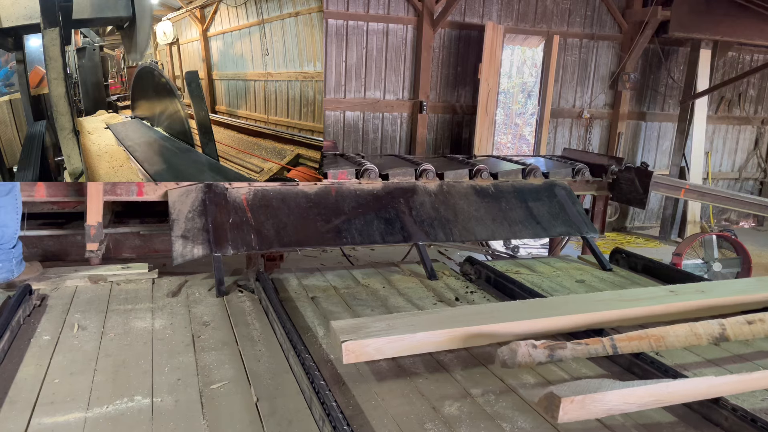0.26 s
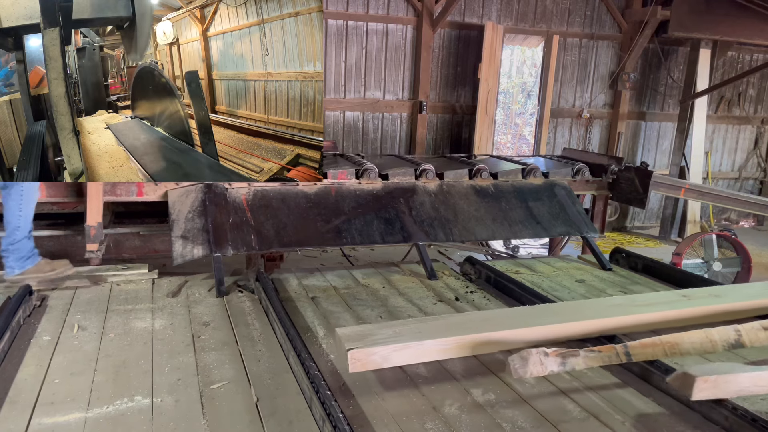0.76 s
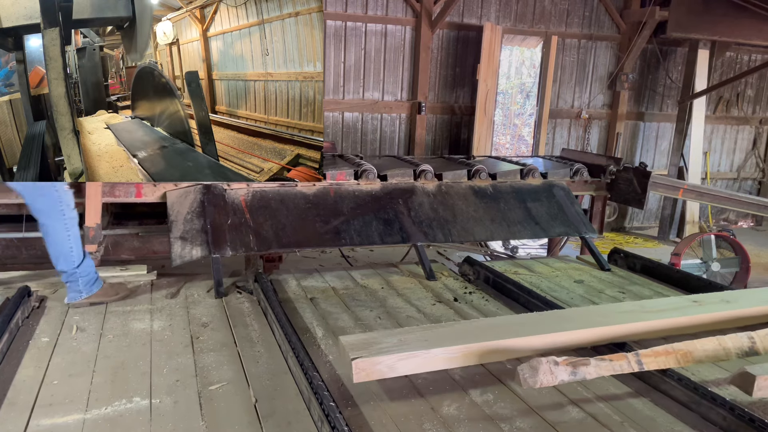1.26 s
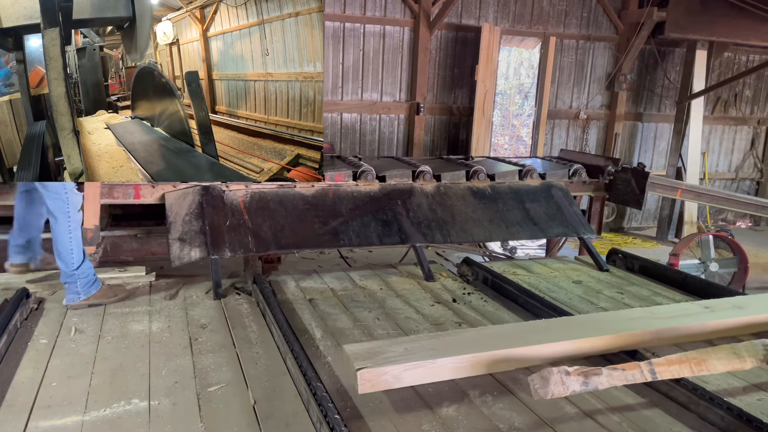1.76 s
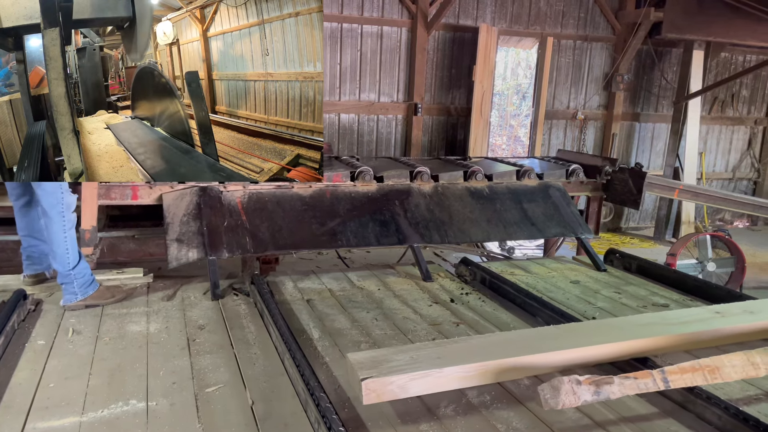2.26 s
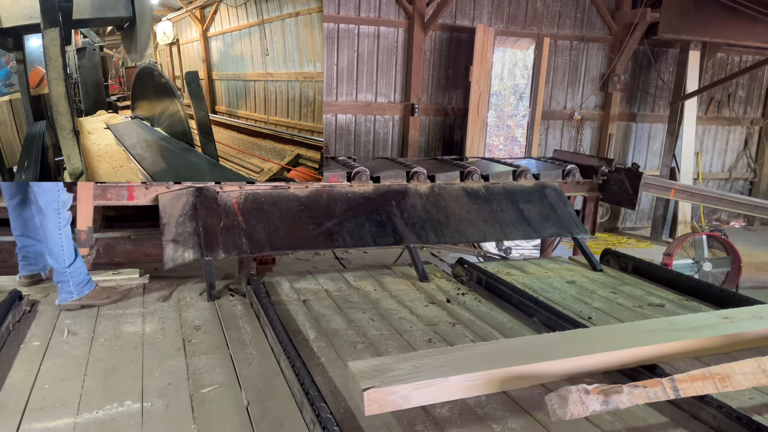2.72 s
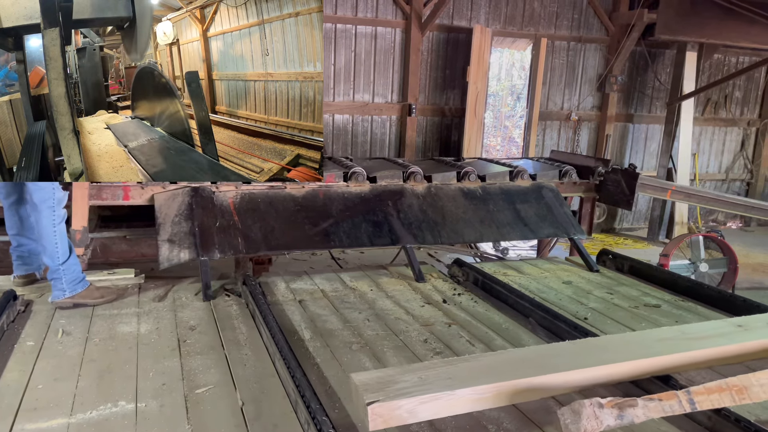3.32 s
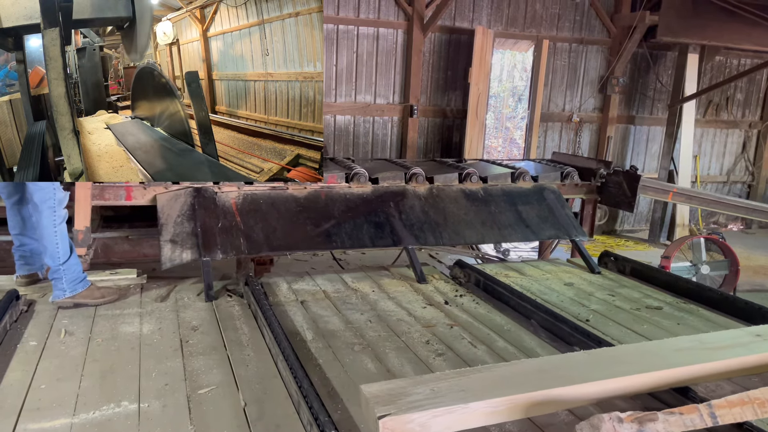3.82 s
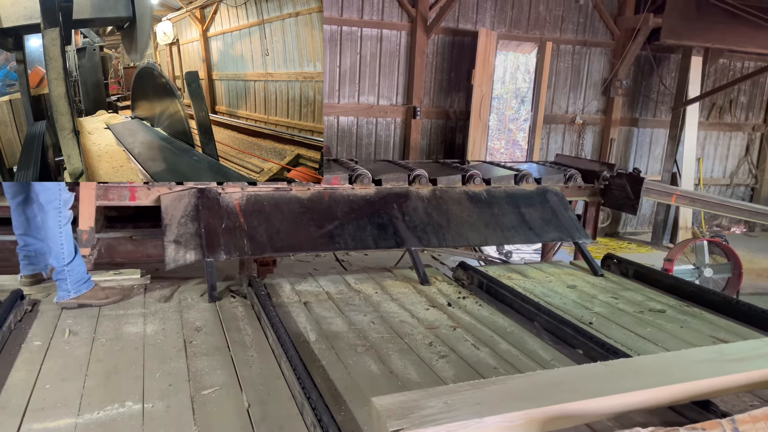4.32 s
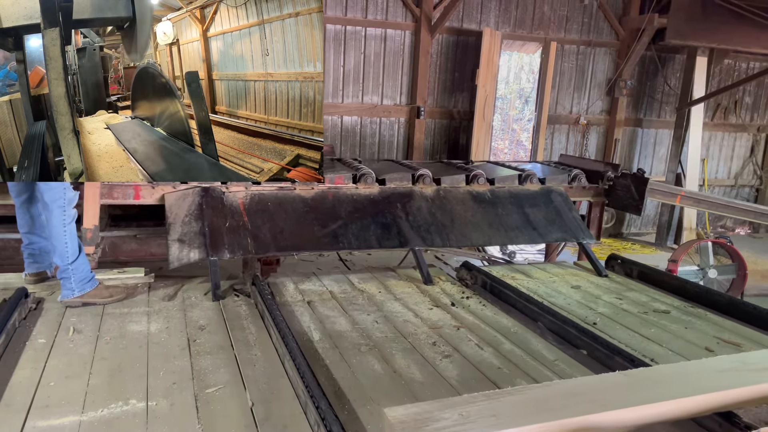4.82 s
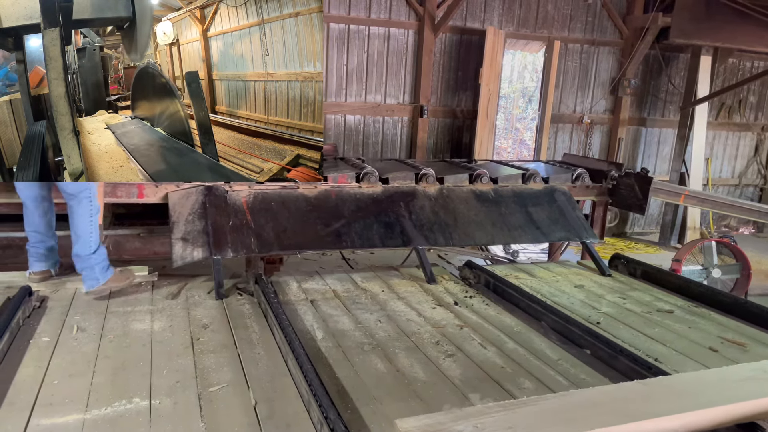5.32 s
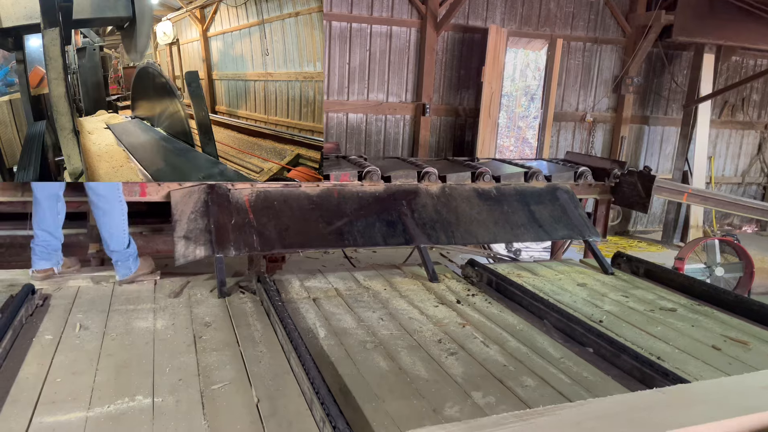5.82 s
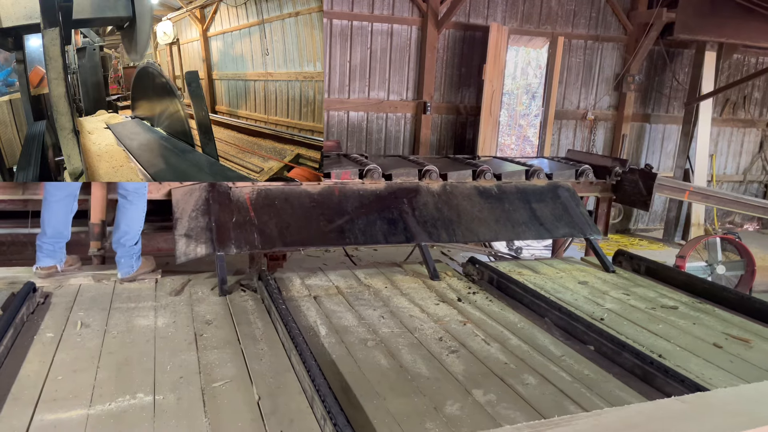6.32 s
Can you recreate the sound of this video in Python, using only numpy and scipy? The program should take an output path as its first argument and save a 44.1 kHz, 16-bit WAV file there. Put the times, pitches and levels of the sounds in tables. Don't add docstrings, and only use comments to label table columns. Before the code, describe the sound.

From 0 s a sawmill shed is already at full work: heavy motor and belt rumble, shaking steel frames, a broad airy roar and a dense, random rattle of chain links over sprockets and rails. Sharp metallic knocks, short and mid-high, strike irregularly throughout, with two at once near 0.1 s and clusters around 0.8 to 1.3, 3.0 to 3.6 and 5.4 to 6.0. A low drive hum swells unevenly, strongest near 1.3 s. Around 2.55 s timber scrapes and gives a low squeak; higher squeaks follow at 2.9 and 3.1, then a hard woody crack at 3.6. Crisp ticks gather near 5.75 to 6.0 s. From about 6.2 s a saw's steady buzzing, singing tone emerges over its faint whine, growing fast until the cut-off at roughly 6.6 s. Floor-level stereo microphones, loud and close, leaning left, diffuse shed around.

```python
import sys
import numpy as np
from scipy import signal
from scipy.fft import rfft, irfft
from scipy.io import wavfile
from scipy.ndimage import uniform_filter1d

SR = 44100
rng = np.random.default_rng(int(sys.argv[2]) if len(sys.argv) > 2 else 0)


def to_wav(s):
    ch = np.atleast_2d(s).T
    pcm = np.round(np.clip(ch, -1, 1) * 32767)
    wavfile.write(sys.argv[1], SR, pcm.astype(np.int16))


def how_loud(loudness_db):
    steps = np.asarray(loudness_db, float) / 20
    return 10 ** steps


N = 289888
T = np.arange(N) / SR
HZ = np.maximum(np.fft.rfftfreq(N, 1 / SR), 1.)
BURST = 16384


def on_hz(table):
    hz, value = np.transpose(table)
    return np.interp(np.log(HZ), np.log(hz), value)


def unit(x):
    return x / np.sqrt(np.mean(x ** 2))


def peak(hz, width_hz, bins=HZ):
    return 1 / np.sqrt(1 + ((bins ** 2 - hz ** 2) / (bins * width_hz)) ** 2)


def noise(gain):
    return irfft(rfft(rng.standard_normal(N)) * gain, N)


def walk(rate):
    hold = int(SR / rate)
    steps = np.repeat(rng.standard_normal(N // hold + 1), hold)
    return 1.92 * uniform_filter1d(uniform_filter1d(steps, hold), hold)[:N]


def ring(x, hz, t60):
    pole = np.exp(2j * np.pi * hz / SR - np.log(1000) / (t60 * SR))
    return signal.lfilter([1], [1, -pole], x).imag


def add(out, s, sound):
    i = int(s * SR) - BURST // 2
    a, b = max(i, 0), min(i + BURST, N)
    out[a:b] += sound[a - i:b - i]


def load():
    # time in seconds, motor effort in dB, drag on the chain in dB.
    plant = [(0, -1.3, -1), (.45, -1, -0.4), (.9, -.5, -1.1), (1.3, 0.1, 0), (2, 0.7, -1.5),
             (2.35, 0, -0.1), (2.8, 1, -0.6), (3.2, -0.5, 0.6), (3.6, -0.5, -0.5), (3.85, 0, -0.5),
             (4.2, 0.5, -1), (4.65, 0.3, -0.4), (5, 0, 0), (5.45, 0, -2), (5.85, 0.5, 0), (6.2, 1.5, 0),
             (6.57, -1.5, -0.5)]
    # dB per dB of effort, dB per dB of drag.
    follows = [
        (1.26, 0.01),
        (0.36, 0.054),
        (0.05, 0.94),
        (0.12, 0.83),
    ]
    s, effort, drag = np.transpose(plant)
    effort_db, drag_db = np.interp(T, s, effort), np.interp(T, s, drag)
    return [a * effort_db + b * drag_db for a, b in follows]


def frames():
    # frequency in Hz, width in Hz, level in dB.
    frame_modes = [(76.9, 6.2, -35), (111.7, 8.4, -32), (164.4, 5.7, -34), (171.4, 16, -31),
                   (246, 15, -34.5), (277.2, 4.8, -30), (323, 9.8, -39), (531.5, 23, -35.5),
                   (608, 24, -33.5), (678.6, 24, -33.5), (907, 34, -33.5), (980, 24, -58), (718, 14, -43),
                   (766.5, 13, -36), (838, 21, -40.5), (1035, 25, -35.5), (1064, 8.6, -45), (1195, 11, -38),
                   (1266, 20, -65), (1289, 19, -43)]
    modes = sum(how_loud(db) * unit(noise(peak(hz, width) ** 2)) for hz, width, db in frame_modes)
    return modes * how_loud(load()[0])


def jerks():
    # time at the crest in seconds, surge in dB, half length in seconds.
    pulls = [(0.352, 1, 0.037), (.76, 2.5, 0.037), (.95, -1.5, .05), (1.303, 0.5, 0.041),
             (1.536, 1.5, 0.063), (1.847, 1.5, 0.071), (2.05, 1.5, 0.027), (2.143, 1.5, 0.054),
             (2.25, 0, 0.033), (2.752, -2, 0.046), (2.876, 2, 0.035), (3.1, 1, 0.063), (3.35, 1, .04),
             (3.45, 0.5, .03), (3.58, 0.5, 0.03), (4.267, 2.5, 0.087), (4.653, -3, 0.042),
             (5.203, 1.5, 0.029), (5.33, 0, .04), (5.45, 1.5, .04), (5.535, 0.5, 0.023), (5.813, 2, 0.074),
             (5.97, 0, 0.034), (6.45, -1.5, 0.094)]
    return sum(db * np.exp(-.5 * ((T - s) / half) ** 2) for s, db, half in pulls)


def link_blows(surge):
    rate_per_s, spread_db = 800, 1.9
    chance = rng.random((2, N))
    strength_db = -spread_db * np.log(1 - chance[1]) + 1.8 * surge + .7 * walk(9)
    return (chance[0] < rate_per_s / SR) * how_loud(strength_db)


def chain(blows):
    # frequency in Hz, level in dB, 60 dB fall time in seconds.
    link_modes = [(1605, -0.5, 0.042), (1820, -24, 0.026), (2180, -33, 0.017), (2310, -6, 0.17),
                  (2520, -2, 0.07), (2780, -1, 0.049), (2913, -1.5, 0.033), (3120, -1, 0.027),
                  (3228, -3.5, 0.058), (3510, -6.5, 0.023), (3857, -7.5, 0.033), (4276, -10, 0.028),
                  (4780, -11.5, 0.02), (6370, -37, .03), (7400, -20, 0.034)]
    hit, out = np.flatnonzero(blows), 0
    for hz, db, t60 in link_modes:
        push = np.zeros(N)
        push[hit] = blows[hit] * rng.standard_normal(len(hit))
        out = out + how_loud(db) * unit(ring(push, hz, t60))
    return unit(out) * how_loud(load()[2] - 26.1)


def knocks():
    # start in seconds, peak level in dB, ring frequency in Hz.
    loud_knocks = [(0.058, -7, 2880), (0.0872, -12, 2520), (0.3311, -29, 2820), (0.3511, -15, 2510),
                   (0.4279, -19, 2450), (0.5038, -14, 3240), (0.7068, -17, 2870), (0.7677, -9, 3020),
                   (0.836, -34, 2310), (0.87, -8.5, 3030), (1.0026, -19, 2800), (1.062, -7.5, 2570),
                   (1.272, -13, 2670), (1.3249, -15, 2480), (1.9589, -9, 3070), (2.0951, -16, 2670),
                   (2.1665, -12, 2520), (2.3087, -15, 2800), (2.3286, -22, 1820), (2.4389, -18, 2780),
                   (2.6155, -21, 2830), (2.9692, -17, 2870), (3.0011, -11, 3200), (3.0674, -9, 2680),
                   (3.0964, -21, 2420), (3.1712, -12, 2070), (3.1946, -23, 2470), (3.2331, -10.5, 3150),
                   (3.4356, -19, 2620), (3.5269, -24, 3030), (3.5696, -10.5, 2830), (3.6316, -17, 3280),
                   (4.145, -19, 2670), (4.1715, -11, 2900), (4.2592, -15, 3320), (4.4273, -14, 2940),
                   (4.5501, -16, 2800), (4.9866, -17, 2910), (5.069, -10, 3140), (5.1696, -13, 3140),
                   (5.4226, -24, 2390), (5.469, -11, 2900), (5.499, -8.5, 2460), (5.7548, -11, 2340),
                   (5.8037, -10, 2230), (5.8341, -23, 3040), (5.9858, -10, 2050), (6.0477, -17, 2700),
                   (6.4358, -12, 2260), (6.538, -18.5, 1870)]
    level_db, attack_s, t60_s = -3.5, 0.00075, .05
    out = np.zeros(N)
    chance = rng.standard_normal((len(loud_knocks), 5, 2))
    for (s, db, hz), draw in zip(loud_knocks, chance):
        i = int(s * SR)
        t = T[:min(6000, N - i)]
        tone = sum(np.sin(2 * np.pi * hz * (1 + 0.11 * d) * t + p) for d, p in draw) / 2.5
        envelope = np.minimum(t / attack_s, 1) * how_loud(-60 * t / t60_s)
        out[i:i + len(t)] += how_loud(db + level_db) * tone * envelope
    return out


def timber():
    # crest in seconds, level in dB, centre in Hz, fall in seconds.
    scrapes = [(.27, -46, 7000, 0.07), (.72, -49, 7000, .05), (1.76, -42, 10000, .07),
               (2.515, -42, 9500, .025), (2.552, -29.5, 7000, 0.017), (2.56, -30, 4600, 0.023),
               (2.685, -37, 6000, .02), (2.9, -38, 5000, .022), (3.06, -35, 9500, 0.016),
               (3.097, -33, 6800, .015), (3.103, -31, 4400, 0.024), (3.068, -30, 5000, .01),
               (3.335, -38, 10500, 0.024), (4.2, -43, 7000, .06), (4.189, -43, 10500, 0.028),
               (4.86, -37, 4470, 0.029), (5.1, -39, 9000, .04), (5.79, -45, 11500, 0.036),
               (5.89, -44, 10500, .05)]
    # crest in seconds, level in dB, pitch in Hz, fall in seconds.
    squeaks = [(2.567, -24.5, 1180, .015), (2.6, -24.5, 1195, .011), (2.895, -30, 2490, .012),
               (3.1, -26.5, 2450, .01), (3.097, -28, 4130, .008), (3.12, -33, 5000, .02),
               (3.11, -32, 4550, .012), (3.13, -32, 4200, .01), (3.095, -33, 5200, .008),
               (4.19, -46, 11000, .02), (3.615, -24, 1950, 0.008), (5.905, -30, 1650, .03)]
    # start in seconds, peak level in dB, centre in Hz, fall in seconds.
    dry_ticks = [(.6604, -24, 5000, .006), (1.197, -24, 4500, .006), (1.749, -36, 9000, .02),
                 (2.548, -25, 5800, .01), (3.3348, -23, 5000, .006), (3.556, -29, 4900, .006),
                 (3.608, -13, 3180, 0.0086), (3.607, -21, 4800, 0.0035), (3.608, -14, 2100, .006),
                 (3.642, -27, 3200, .004), (3.6865, -23, 4800, .005), (4.024, -23, 4500, .006),
                 (4.5965, -33, 4600, .005), (4.9616, -29, 4700, .005), (5.5707, -27, 4900, .005),
                 (5.751, -20, 4700, .005), (5.766, -23, 6600, .008), (5.766, -28, 15200, .005),
                 (5.766, -25, 11000, .004), (5.776, -31, 12000, .005), (5.795, -17, 6000, 0.006),
                 (5.796, -24, 11300, .006), (5.814, -26, 10800, 0.0066), (5.816, -16.5, 6500, .008),
                 (5.991, -20, 4500, .005), (6.118, -28, 6000, .005), (6.142, -27, 5500, .005),
                 (6.142, -31, 10000, .004), (6.142, -35, 14500, .003), (6.118, -40, 13000, .004),
                 (6.239, -33, 10500, .005)]
    drags, ticks = np.zeros(N), np.zeros(N)
    t = (np.arange(BURST) - BURST // 2) / SR
    bins = np.maximum(np.fft.rfftfreq(BURST, 1 / SR), 1.)

    def hiss(hz, width_hz):
        return unit(irfft(rfft(rng.standard_normal(BURST)) * peak(hz, width_hz, bins) ** 2))

    def squeal(hz):
        tone = np.sin(2 * np.pi * (hz * t + rng.random()))
        return unit(tone + .35 * hiss(hz, .08 * hz))

    def swell(fall):
        return np.exp(-.5 * (t / np.where(t < 0, .6 * fall, fall)) ** 2)

    for s, db, hz, fall in scrapes:
        add(drags, s, how_loud(db) * swell(fall) * hiss(hz, .75 * hz))
    for s, db, hz, fall in squeaks:
        add(drags, s, how_loud(db) * swell(fall) * squeal(hz))
    for s, db, hz, fall in dry_ticks:
        age = np.maximum(t, 0)
        decay = (t >= 0) * (0.92 * np.exp(-age / 0.003) + 1.05 * np.exp(-age / fall))
        add(ticks, s, how_loud(db - 9.5) * decay * hiss(hz, 0.66 * hz))
    gritty = drags * how_loud(2.4 * walk(220))
    drag_top_hz, tick_top_hz = 11600, 13200
    dull = rfft(gritty) / (1 + (HZ / drag_top_hz) ** 8)
    crisp = rfft(ticks) / (1 + (HZ / tick_top_hz) ** 8)
    return irfft(dull + crisp, N)


def hum():
    # crest in seconds, level in dB, half length in seconds.
    belt_swells = [(.05, -22, .08), (.25, -30, .06), (.48, -18.5, .08), (.7, -28, .06), (.93, -21, .09),
                   (1.12, -27, .05), (1.3, -14, .09), (1.63, -19, .07), (1.82, -19, .06), (2.05, -22, .04),
                   (2.25, -25, .04), (2.62, -24, .1), (2.85, -24, .05), (3.04, -23, .05),
                   (3.48, -19.5, .07), (3.77, -18, .08), (4.05, -23, .04), (4.68, -20, .05),
                   (5.35, -23, .06), (5.91, -19, .06), (6.38, -24, .05)]
    hum_hz, left_lag_rad, idle_db = 386.6, 1.46, -34
    swell = sum(how_loud(db) * np.exp(-.5 * ((T - s) / half) ** 2) for s, db, half in belt_swells)
    left = how_loud(idle_db) + how_loud(-6) * swell
    right = how_loud(idle_db + 1) + swell
    phase = 2 * np.pi * hum_hz * T + 1.1 * walk(2.594)
    ports = []
    for size, side in ((left, 1), (right, -1)):
        wobble = how_loud(-0.1 * walk(15))
        tone = np.sin(phase - side * left_lag_rad / 2 + 0.14 * walk(8.1))
        ports.append(size * wobble * tone)
    return np.array(ports)


def saw():
    # multiple of the tooth rate, level in dB.
    teeth = [
        (1, -26),
        (2, -8.5),
        (4, -1.5),
        (5, -14),
        (6, -15.5),
        (7, -20),
        (8, -24),
    ]
    tooth_hz = 270.1
    phase = 2 * np.pi * tooth_hz * T
    level_db = -17 + 44 * (T - T[-1]) + walk(18)
    third_db = -20 + 50 * np.minimum(T - 6.41, 0)
    stack = how_loud(level_db) * sum(how_loud(db) * np.sin(k * phase + k * k) for k, db in teeth)
    third_left = how_loud(third_db) * np.sin(3 * phase)
    third_right = how_loud(third_db - 4.5) * np.sin(3 * phase + 2.45)
    singing = np.array([stack + third_left, how_loud(-5) * stack + third_right])
    whine = how_loud(-46 + 2.5 * walk(6)) * np.sin(4 * phase + 16 + .4 * walk(5))
    idle = whine * how_loud(np.array([[3], [-2]]))
    bite = np.clip((T - 6.14) / .15, 0, 1)
    return np.sqrt(2) * bite * singing + idle


def roar(flicker_db):
    # frequency in Hz, level in dB per Hz.
    roar_colour = [(14, -26), (28, -4), (60, -5.5), (110, -2.5), (230, -4), (350, -6.5), (450, -9),
                   (1000, -11), (2500, -17), (5500, -29.5), (8000, -32), (10500, -40.5), (13000, -60.5),
                   (15500, -59)]
    edges_hz = [1, 400, 1600, 4600, SR]
    shares_db = [-0.48, -0.18, -0.8, -2.64]
    colour, out = how_loud(on_hz(roar_colour)), 0
    for k, load_db in enumerate(load()):
        low_edge = 1 + (edges_hz[k] / HZ) ** 8
        high_edge = 1 + (HZ / edges_hz[k + 1]) ** 8
        part = 1 / np.sqrt(low_edge * high_edge)
        out = out + noise(colour * part) * how_loud(load_db + shares_db[k] + flicker_db[k])
    return how_loud(4.0) * out


def at_ports(shared, own):
    # frequency in Hz, likeness from 0 to 1.
    likeness = [(25, .1), (42, .35), (65, .93), (150, .965), (300, .92), (400, .55), (520, .66), (780, .3),
                (1200, .74), (2800, .79), (4500, .55), (6000, .25), (7800, .5), (8400, .88), (9600, .85),
                (11500, .4), (13000, .4), (14000, .6), (15000, .75)]
    # frequency in Hz, lead of the left in radians.
    left_lead = [(30, -1), (60, 0), (900, -.2), (1600, -.75), (3400, -.75), (5300, 0), (6200, -.8),
                 (7400, -2.3), (8300, -3), (9600, -3.6), (10500, -4.3), (12300, -6.2), (16000, -6.3)]
    # frequency in Hz, left minus right in dB.
    balance_db = [(25, 2.5), (60, 1), (200, 1), (380, .5), (700, 2.5), (1300, 3), (2400, 3.7), (7000, 3.7),
                  (8300, 0), (15000, 0)]
    like = on_hz(likeness)
    right = like * np.exp(-1j * on_hz(left_lead)) * shared + np.sqrt(1 - like ** 2) * own
    return np.array([irfft(shared, N), irfft(right * how_loud(-on_hz(balance_db)), N)])


def scene():
    surge = jerks()
    flicker_db = [.5 * walk(10), .5 * walk(4.63),
                  0.31 * surge + 0.76 * walk(13), 0.43 * surge + 0.69 * walk(12)]
    blows = link_blows(surge)
    shared, own = (rfft(roar(flicker_db) + frames() + chain(blows) + knocks() + timber())
                   for _ in range(2))
    return at_ports(shared, own) + hum() + saw()


def low_pass(x):
    return signal.sosfilt(signal.butter(12, 15710, fs=SR, output="sos"), x)


def record(dry):
    rounded = np.tanh(0.64 * dry) / 0.58
    edge = signal.butter(8, 15100, fs=SR, output="sos")
    return low_pass(signal.sosfilt(edge, rounded))


dry = scene()
out = record(dry)
to_wav(out)
```